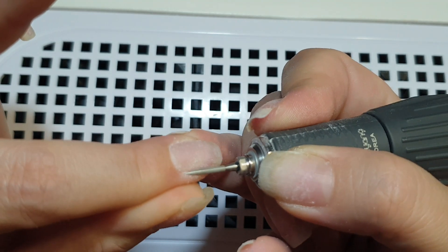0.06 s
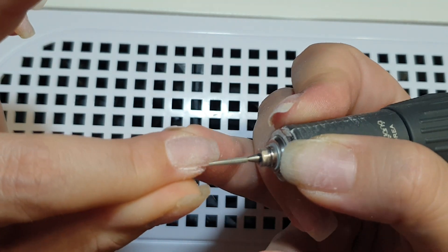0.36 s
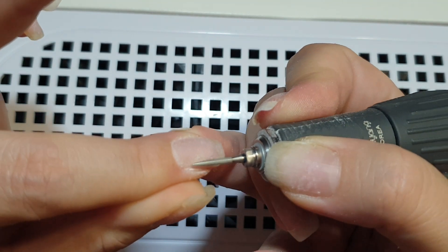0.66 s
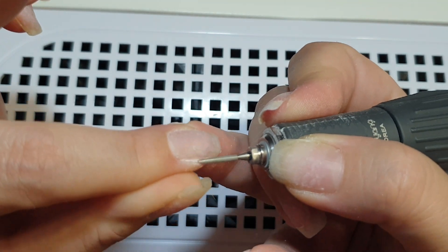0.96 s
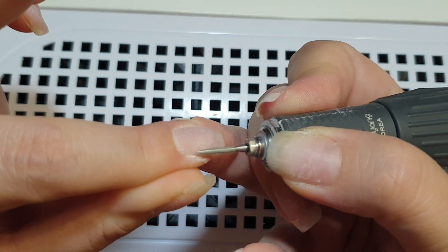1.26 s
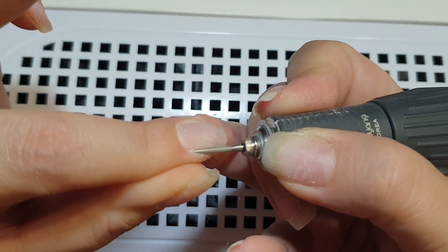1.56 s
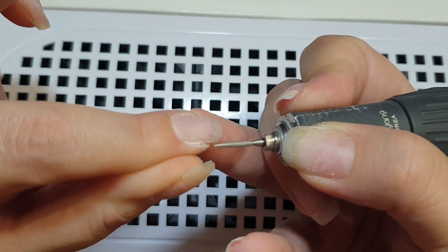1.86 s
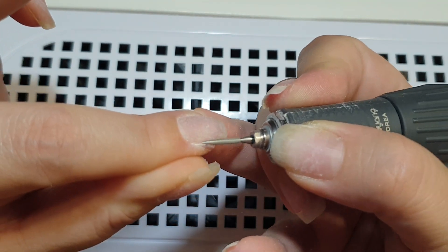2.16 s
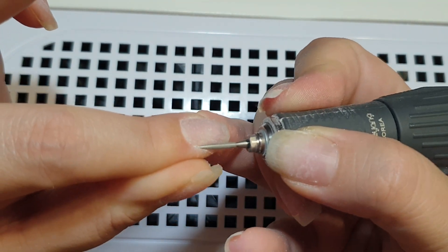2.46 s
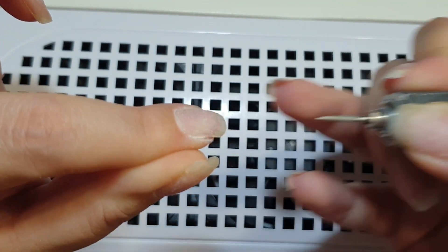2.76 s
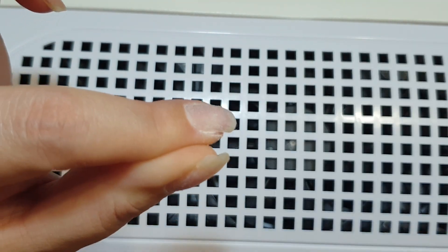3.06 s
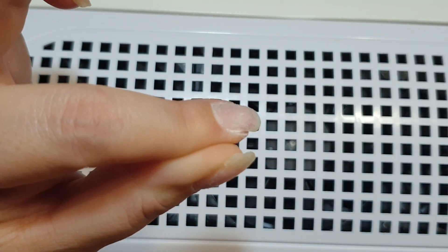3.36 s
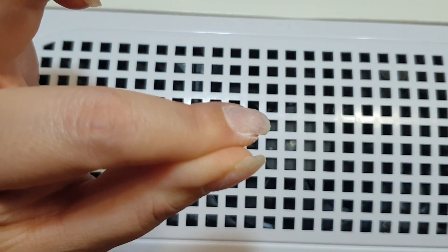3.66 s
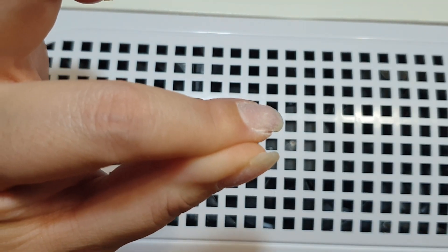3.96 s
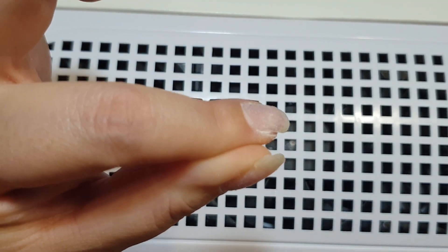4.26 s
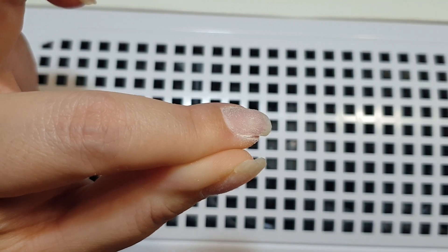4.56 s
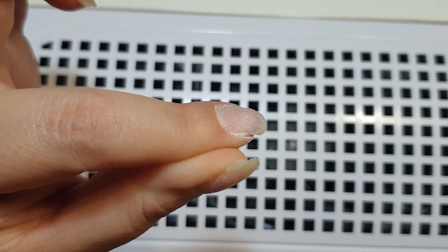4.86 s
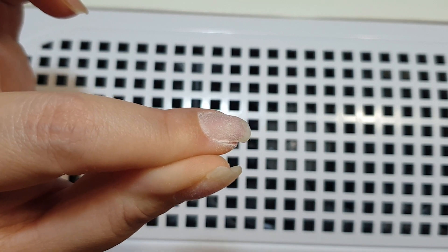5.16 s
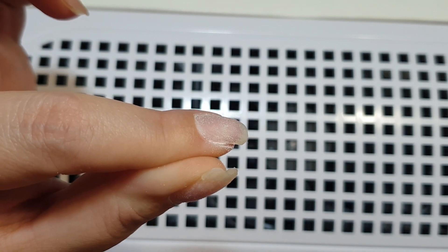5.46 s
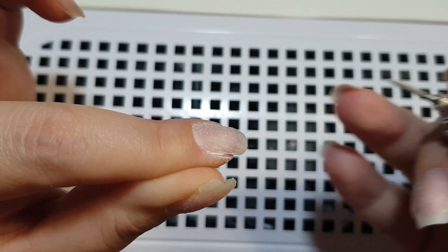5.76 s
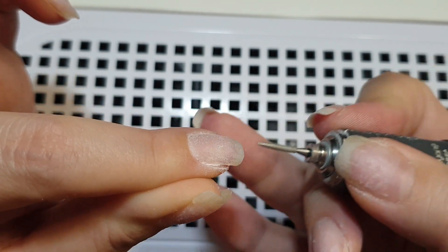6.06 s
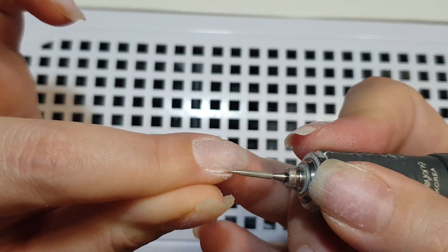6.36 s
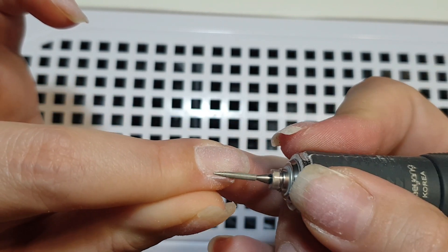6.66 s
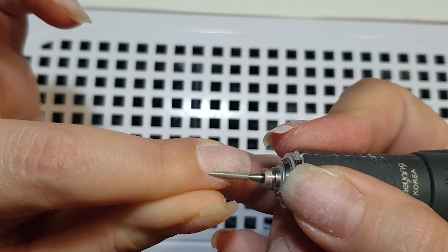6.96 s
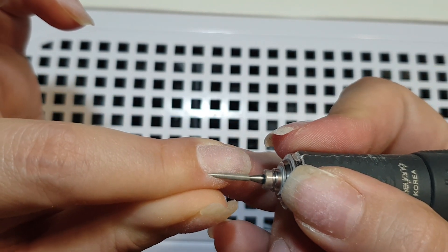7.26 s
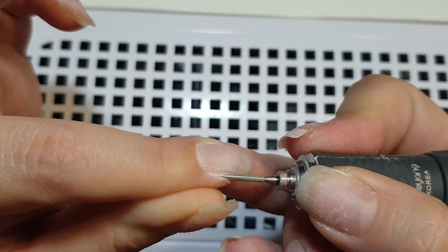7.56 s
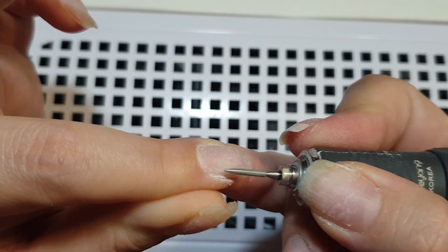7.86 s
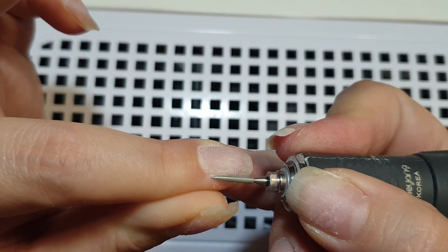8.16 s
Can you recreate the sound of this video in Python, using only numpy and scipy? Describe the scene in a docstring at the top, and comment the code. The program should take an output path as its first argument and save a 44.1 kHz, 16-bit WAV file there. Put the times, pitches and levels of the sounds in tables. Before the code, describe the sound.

Steady whine of a small nail drill that grazes a fingernail, is held aside still spinning, then returns for a few strokes.

```python
"""An electric nail drill spins close by at about 404 turns a second: hum, whine, bearing lines and a
pulsing hiss over a faint room rumble. From the start its bit rasps on a fingernail, a light graze with
short strokes. At 2.5 s the handpiece is drawn away past the right microphone and held aside while the
fingers shift softly. It comes back between 5.2 and 6.1 s, and from 7 s three more strokes follow."""
import sys
import numpy as np
from scipy import signal
from scipy.fft import rfft, irfft, next_fast_len
from scipy.io import wavfile
from scipy.ndimage import map_coordinates

SR = 44100
rng = np.random.default_rng(int(sys.argv[2]) if len(sys.argv) > 2 else 0)


def store_wav(level_fs):
    """Save 16-bit WAV to argv[1]."""
    pcm = np.round(np.clip(np.atleast_2d(level_fs), -1, 1) * 32767)
    wavfile.write(sys.argv[1], SR, pcm.T.astype(np.int16))


N = 362061

# Commutator whine. Each row: time in seconds, left level in dB, right level in dB.
WHINE_DB = [(0.0, -42, -44.5), (0.25, -40.5, -46.5), (0.78, -45.5, -40.5), (1.13, -56, -44),
            (1.7, -38.5, -40), (2.25, -46, -42.4), (2.6, -44, -35.6), (2.85, -37.5, -38.5),
            (3.14, -34, -29.5), (3.4, -40, -35.5), (3.62, -34, -43), (3.9, -38.5, -44.5), (4.5, -37, -42),
            (5.1, -35.5, -38), (5.41, -37, -30), (5.72, -35, -36.5), (6.08, -36.5, -35), (6.3, -53, -37.5),
            (6.55, -37, -42), (6.9, -37, -40.5), (7.15, -38.5, -42), (7.42, -35.5, -38), (7.75, -41, -38),
            (8.21, -44, -45)]
# Whine nulls. Each row: time in seconds, microphone (0 left, 1 right), half length in seconds, depth in dB.
WHINE_NULLS = [(.49, 0, .076, 12), (.7, 1, .03, 8), (1.81, 1, .122, 8), (2.59, 1, .144, 13),
               (2.98, 1, .046, 14), (3.05, 0, .071, 13), (3.07, 1, .025, 6), (3.225, 1, .028, 7),
               (3.26, 0, .083, 15), (3.38, 1, .035, 6), (3.54, 1, .026, 11), (5.03, 0, .04, 7),
               (5.14, 1, .031, 17), (5.23, 0, .083, 13), (5.295, 1, .028, 8), (5.5, 0, .117, 17),
               (5.57, 1, .047, 4), (6.02, 0, .117, 11), (7.51, 1, .04, 5)]
# Reflections off the hands shift the whine. Each row: time in seconds, extra left lag in ms.
WHINE_LAG_MS = [(.7, -0.025), (.8, 0.013), (3.25, 0.023), (3.41, 0.099), (3.62, 0.0078), (3.9, -0.058),
                (4.35, 0.011), (4.85, 0.014), (5.05, -0.034), (5.3, 0.002), (5.8, 0.049), (6.15, -0.13),
                (6.55, 0.024), (7, -0.027), (7.4, -0.023), (7.57, -0.015), (7.7, 0.012), (7.95, -0.035)]
# Weaker shaft harmonics. Each row: shaft multiple, relative level in dB at the nail, then aside.
HARMONICS_DB = [(2, -75, -66), (3, -58, -67), (4, -64, -67), (5, -62, -59), (7, -58, -54), (8, -62, -61),
                (9, -61, -65), (11, -66, -65), (13, -63, -63), (14, -58.5, -57.5), (15, -64, -63),
                (16, -64, -62), (17, -55.5, -58), (19, -58, -54), (20, -59, -56), (21, -63, -61),
                (22, -64, -67), (23, -62, -57), (24, -62, -61), (25, -59, -62), (26, -56.5, -55.5),
                (27, -57, -55), (29, -56, -60), (30, -60.5, -55), (31, -60, -55), (32, -59, -61),
                (33, -60, -61), (34, -62, -60), (36, -64, -64), (37, -63, -67), (38, -60, -64)]
# Whistles at harmonics 18, 28 and 35. Each row: time in seconds, relative level in dB left, then right.
WHISTLE_18_DB = [(0, -62, -58), (2.5, -62, -60), (2.84, -61, -52), (3.64, -58.5, -56), (4.16, -69, -68),
                 (4.24, -49.5, -47.5), (4.96, -52, -49.5), (5.08, -56, -66), (5.32, -58, -51),
                 (5.48, -68, -62), (5.8, -60, -53), (6.3, -62, -57), (8.21, -62, -59)]
WHISTLE_28_DB = [(0, -48, -57), (0.8, -52, -58), (1.08, -53, -63), (1.8, -49, -58), (1.92, -54, -64),
                 (2.76, -50.5, -53), (2.84, -43.5, -47.5), (2.96, -51.5, -52), (3.12, -53, -40),
                 (3.44, -49.5, -50), (3.68, -42.5, -39), (4, -52.5, -57.5), (4.26, -37.5, -43.5),
                 (4.86, -39.5, -44.5), (5.04, -50, -48), (5.52, -51, -42), (5.92, -52.5, -53.5),
                 (6.32, -44, -56), (6.64, -47.5, -52.5), (7.56, -60, -55), (7.76, -46, -52.5),
                 (8.21, -59, -59)]
WHISTLE_35_DB = [(0, -47, -52), (0.16, -63, -53), (0.52, -53, -50), (1.36, -54, -47.5), (1.8, -61, -49),
                 (2.44, -55, -52), (3, -58, -48), (3.6, -53, -61.5), (4.56, -52, -61.5), (5.44, -60, -51),
                 (5.6, -58.5, -61), (5.72, -56.5, -48), (6.36, -48.5, -48.5), (6.48, -47.5, -57.5),
                 (6.96, -46, -57), (7.52, -59.5, -60.5), (8.21, -48.5, -57.5)]
# Strongest bearing line. Each row: time in seconds, level in dB.
BALL_DB = [(0.0, -52), (0.51, -56.5), (0.76, -50.5), (1.02, -60), (1.65, -50), (1.78, -61), (2.16, -53.5),
           (3.17, -61), (3.3, -55.5), (4.44, -60.5), (4.83, -54.5), (5.08, -60), (5.59, -46.5), (5.84, -53),
           (7.37, -49.5), (7.75, -58), (7.87, -50), (8.21, -53)]
# Other bearing lines. Each row: shaft multiple, relative level in dB.
BEARING_LINES_DB = [(3.303, -63), (16.874, -60), (21.59, -62), (27.55, -62), (34.76, -62)]
# Hiss spectrum. Each row: frequency in Hz, gain in dB at the nail, aside, in a pass.
HISS_COLOUR_DB = [(150, -19, -19, -25.5), (325, -15.5, -15.5, -18), (520, -8, -19.5, -11.5),
                  (572, -16, -21.5, -21), (1090, -7.5, -14.5, -14.5), (1740, -8, -9, -8),
                  (2044, 0.5, -5.5, -14.5), (2330, -2, -4.5, -2.5), (2870, 0.5, -9, -4.5),
                  (3000, -1, -3.5, -1), (3230, -5.5, -6, -5), (3870, -5.5, -4.5, -4.5),
                  (4720, -6.5, -7, -7), (4960, -7, -8.5, -8.5), (5460, -7.5, -11, -10),
                  (7200, -11, -10.5, -15), (8060, -14, -14, -16), (8900, -12, -11, -20),
                  (9800, -14, -15, -16), (10700, -10, -11, -19), (12600, -19.5, -16, -13),
                  (15600, -23, -19, -21)]
# Shading of one microphone. Each row: frequency in Hz, right minus left in dB at the nail, aside, in a pass.
BALANCE_DB = [(960, 0, -3, 2.6), (1980, 2, 5, 2.4), (4530, -2, 0, 6.6), (7150, 6, 1.5, 9.6),
              (9300, 0.5, -6, 4.6), (10900, -3, -1, 9.9), (13500, -15, 0.5, 13)]
# Hiss arriving straight from the handpiece. Each row: frequency in Hz, power share 0-1.
DIRECT_SHARE = [(300, 0.51), (1200, 0.54), (2200, 0.44), (3500, 0.63), (4700, 0.35), (7000, 0),
                (15000, 0.13)]
# Bit on nail. Each row: start in seconds, length in seconds, first level in dB, last level in dB,
# pressure 0-1, left minus right in dB, ring of the nail in Hz.
BIT_STROKES = [(0, 2.75, -50, -51.5, 0, 10, 6880), (0.01, 0.23, -41, -37, 0.82, 6, 6070),
               (0.725, 0.15, -38.5, -35.5, 0.12, 7.5, 5660), (1.345, 0.02, -33.5, -29, 0.22, 6.5, 5660),
               (1.383, 0.035, -36, -36.5, 0.1, 5, 6470), (1.654, 0.055, -39, -34.5, .3, 4.5, 6470),
               (1.745, 0.045, -42, -39.5, 0.61, 6, 5660), (2.373, 0.2535, -44, -41.5, .8, 9, 5660),
               (7.067, 0.071, -42, -52, 0.51, 2, 6470), (7.256, 0.34, -45, -39.5, 1, 0, 6360),
               (7.937, 0.019, -31.5, -43, 0.83, 2, 5560)]
# Response of bit and nail. Each row: frequency in Hz, gain in dB.
BIT_RESPONSE_DB = [(4600, -28), (5250, -12), (5660, -3), (6070, -6.5), (6470, -5.5), (6880, -4.5),
                   (7280, -9), (7700, -11.5), (8080, -9), (8500, -14), (9700, -20), (14000, -36)]
# Room rumble spectrum. Each row: frequency in Hz, relative level in dB.
RUMBLE_DB = [(12, -35), (20, 2.5), (59, 1), (83, 2), (102, -9), (135, 2.5), (188, -16), (330, -8),
             (430, -14), (730, -120)]
# Hand rubs. Each row: centre in seconds, length in seconds, pitch in Hz, width over pitch, level in dB.
HAND_RUBS = [(0.429, 0.15, 207, 0.29, -61), (2.61, 0.038, 150, 0.9, -56), (2.713, 0.1, 56.7, .25, -63),
             (4.047, 0.03, 272, 0.49, -58), (4.09, .04, 56, .3, -60), (4.364, 0.16, 221, .12, -59.5),
             (4.508, 0.05, 280, .22, -59), (4.924, 0.087, 227, .06, -53.5), (5.098, 0.2, 184, .12, -66),
             (5.28, 0.057, 300, 0.36, -53.5)]
# Sweeps past the right microphone. Each row: time in seconds, direction (positive away, negative back).
MIC_PASSES = [(3.141, 0.58), (5.42, -0.67)]

FREE_HZ = 404.5  # unloaded shaft
LEAVE_S, LEAVE_TAKES_S, RETURN_S, RETURN_TAKES_S = 2.52, 1, 5.15, 0.99
SETTLE_S, SETTLE_TAKES_S = 6.34, 0.11  # new grip, a little nearer
LEFT, RIGHT = np.eye(2)[:, :, None]  # channel masks


def amp(db):
    """Decibels to gain."""
    return np.exp(np.asarray(db) * (np.log(10) / 20))


def unit(x):
    """Scaled to rms 1."""
    return x / np.sqrt(np.mean(x ** 2) + 1e-20)


def along(points, hz, column=1):
    """One table column, interpolated over log frequency."""
    columns = np.transpose(points)
    return np.interp(np.log(hz + 1), np.log(columns[0] + 1), columns[column])


def curves(rows):
    """One value per sample for each column after the time."""
    times_s, *columns = np.transpose(rows)
    return np.array([np.interp(np.arange(N) / SR, times_s, column) for column in columns])


def ramp(start_s, takes_s):
    """Linear rise from 0 to 1."""
    return np.clip((np.arange(N) / SR - start_s) / takes_s, 0, 1)


def bell(centre_s, half_s):
    """Gaussian swell to 1."""
    return np.exp(-((np.arange(N) / SR - centre_s) / half_s) ** 2)


def wander(path, size=2048):
    """Smooth random curve, one knot per unit of path."""
    coarse = np.linspace(0, N - 1, size * 2).astype(int)
    values = map_coordinates(rng.standard_normal(size), [path[coarse]], mode="wrap")
    return np.interp(np.arange(N), coarse, values)


def wobble(rate_hz):
    """Smooth random curve in time."""
    return wander(np.arange(N) * (rate_hz / SR))


def filtered(x, response):
    """x through a complex frequency response."""
    size = next_fast_len(N + SR // 4, real=True)
    return irfft(rfft(x, size) * response(np.fft.rfftfreq(size, 1 / SR)), size)[..., :N]


def tone(cycles):
    """Sine of rms 1 from a running cycle count."""
    return np.sqrt(2) * np.sin((2 * np.pi * (cycles - np.floor(cycles))).astype(np.float32))


def narrow_noise(cycles, width_hz):
    """Noise of rms 1 around a tone."""
    lowpass = lambda hz: 1 / (1 + 1j * hz / width_hz) / (1 + 1j * hz / (4 * width_hz))
    in_phase, quadrature = filtered(rng.standard_normal((2, N)), lowpass)
    return unit(in_phase * tone(cycles) + quadrature * tone(cycles + 1 / 4))


def delayed(x, delay_ms, order=3):
    """Sliding fractional delay."""
    return map_coordinates(x, [np.arange(N) - delay_ms * SR / 1000], order=order, mode="nearest")


def at_microphones(x, lag_ms):
    """Stereo pair; the left lags."""
    return np.array([delayed(x, lag_ms), x])


def balance_db(hz, column):
    """Left and right gain for one place of the handpiece."""
    return (RIGHT - LEFT) / 2 * along(BALANCE_DB, hz, column)


def moving(aside):
    """1 halfway through a move, 0 at rest."""
    return 4 * aside * (1 - aside)


def strokes(attack_s=0.0096, release_s=0.047, press_s=0.12):
    """Each stroke bites, holds and lets go: stereo rasp gain, and the slower hand pressure."""
    scrape, pressure = np.zeros((2, N)), np.zeros(N)
    ring_hz = np.zeros(N)
    for start_s, length_s, first_db, last_db, press, pan_db, nail_hz in BIT_STROKES:
        held = lambda rise_s, fall_s: ramp(start_s - rise_s, rise_s) - ramp(start_s + length_s, fall_s)
        level_db = first_db + (last_db - first_db) * ramp(start_s, length_s)
        gain = held(attack_s, release_s) * amp(level_db + pan_db * (LEFT - RIGHT) / 2)
        scrape = np.maximum(scrape, gain)
        pressure += press * held(press_s, press_s)
        ring_hz[max(round((start_s - attack_s) * SR), 0):] = nail_hz  # holds until the next stroke
    return scrape, pressure, ring_hz


def shaft(pressure, sag_hz=1.6, inertia_s=0.136):
    """Running turn count: pressure slows the rotor, inertia smooths the change."""
    pole = np.exp(-1 / (inertia_s * SR))
    load = signal.lfilter([1 - pole], [1, -pole], pressure)
    return np.cumsum(FREE_HZ - sag_hz * load + 0.13 * wobble(20)) / SR


def place(nail_ms=0.1465, aside_ms=0.0774, pass_ms=0.43, nail_side_s=0.14, far_side_s=0.099):
    """Handpiece position: left lag in ms, drawn aside 0-1, close to the right microphone 0-1."""
    t = np.arange(N) / SR
    aside = ramp(LEAVE_S, LEAVE_TAKES_S) - ramp(RETURN_S, RETURN_TAKES_S)
    close, swing = np.zeros((2, N))
    for pass_s, direction in MIC_PASSES:
        close += bell(pass_s, np.where(direction * (t - pass_s) < 0, nail_side_s, far_side_s))
        swing += bell(pass_s + direction * 0.0089, half_s=0.2887)
    drift_ms = 0.0022 * np.maximum(t - SETTLE_S, 0)  # slow turn toward the middle
    resting_ms = nail_ms + aside * (aside_ms - nail_ms) - drift_ms
    return resting_ms + swing * (pass_ms - resting_ms), aside, close


def hum(turns, lag_ms, aside, close, pressure, free_db=-56.5, press_db=4, pass_loss_db=6.5):
    """Unbalance hums once a turn, louder under pressure; aside, the hand shields the left side."""
    level_db = free_db + press_db * pressure - pass_loss_db * close + 1.73 * wobble(30)
    shield_db = aside * (2.5 * RIGHT - 6 * LEFT)
    return amp(level_db + shield_db) * at_microphones(tone(turns), lag_ms * 0.58)


def rotor_buzz(turns, aside, scrape, base_db=-48, scrape_db=6, aside_loss_db=7, move_loss_db=6):
    """Rough buzz six times a turn, louder as the bit scrapes, radiated in two opposed lobes."""
    contact = np.tanh(scrape.mean(axis=0) / amp(-39))
    level_db = base_db + scrape_db * contact - aside_loss_db * aside - move_loss_db * moving(aside)
    level_db += 0.16 * wobble(40)
    buzz = unit(tone(6 * turns) + 0.19 * narrow_noise(6 * turns, width_hz=40))
    lobes = np.array([1.1 - 1.35 * aside, 0.68 + 0.67 * aside])  # aside, the far lobe faces left
    return amp(level_db) * buzz * lobes


def whine(heard_turns):
    """Commutator tone, ten times a turn; nulls between its lobes sweep over the microphones."""
    level_db = curves(WHINE_DB)
    for centre_s, mic, half_s, depth_db in WHINE_NULLS:
        level_db[mic] -= depth_db * bell(centre_s, half_s)
    late_turns = LEFT * curves(WHINE_LAG_MS) * FREE_HZ / 1000
    return amp(level_db + 0.6 * wobble(50)) * tone(10 * (heard_turns - late_turns))


def harmonics(heard_turns, aside, travel, flutter_db=2.56, beam_db=3, beam_hz=7000):
    """Reflections swell, fade and phase-shift each harmonic; on the move, high ones beam in flashes."""
    motion = moving(aside)
    depth_db = 2 + 1.5 * motion
    out = np.zeros((2, N))
    for multiple, nail_db, aside_db in HARMONICS_DB:
        hz = multiple * FREE_HZ
        level_db = nail_db + aside * (aside_db - nail_db + balance_db(hz, 2)) + flutter_db * wobble(45)
        level_db += beam_db * motion * min(hz / beam_hz, 1) ** 2 * (1 + 0.5 * wobble(20))
        start_cycles = rng.random()
        for mic in range(2):
            shift_cycles = start_cycles + 0.25 * rng.standard_normal() + 0.13 * wander(travel)
            gain = amp(level_db[mic] + depth_db * wander(travel))
            out[mic] += gain * tone(multiple * heard_turns[mic] + shift_cycles)
    return amp(-1.5) * out


def whistles(heard_turns, aside, travel, flutter_db=1.5, pattern_db=1.5, moving_db=2.5):
    """Three strong high harmonics beam narrowly, so they come and go as the hand turns."""
    out = np.zeros((2, N))
    for multiple, levels in ((18, WHISTLE_18_DB), (28, WHISTLE_28_DB), (35, WHISTLE_35_DB)):
        level_db = curves(levels) + flutter_db * wobble(45)
        for mic in range(2):
            shift_cycles = 0.2 * rng.standard_normal() + 0.14 * wander(travel)
            swell_db = pattern_db * wander(travel) + moving_db * moving(aside) * wobble(22)
            out[mic] += amp(level_db[mic] + swell_db) * tone(multiple * heard_turns[mic] + shift_cycles)
    return amp(-0.5) * out


def bearing(heard_turns, swell_db=2, slip_cycles=0.08, ball_multiple=4.414):
    """Rolling balls slip, so their lines waver between the harmonics; the strongest comes and goes."""
    line = lambda multiple: tone(multiple * heard_turns + slip_cycles * wobble(25))
    out = amp(curves(BALL_DB) + wobble(22)) * line(ball_multiple)
    for multiple, level_db in BEARING_LINES_DB:
        out += amp(level_db - 4.5 + swell_db * wobble(6.2)) * line(multiple)
    return out


def cage(turns, rounds_per_turn=0.3678, throb=0.72, flaw_count=256):
    """The ball cage rolls over the same flaws every round: a whirr of close lines."""
    rounds = rounds_per_turn * turns + 0.0054 * wobble(25)
    flaws = map_coordinates(rng.standard_normal(flaw_count), [rounds % 1 * flaw_count], mode="grid-wrap")
    return unit(flaws * (1 + throb * tone(turns)))


def brush_noise(turns, lag_ms, aside, travel, cage_share=0.3, echo_gain=0.29, throb=0.18):
    """Brush and bearing noise, direct plus diffuse, combed by a table echo; throbs once a turn."""
    share = lambda hz: np.clip(along(DIRECT_SHARE, hz), 0, 1)
    source = np.sqrt(1 - cage_share) * rng.standard_normal(N) + np.sqrt(cage_share) * cage(turns)
    direct = filtered(at_microphones(source, lag_ms), lambda hz: np.sqrt(share(hz)))
    diffuse = filtered(rng.standard_normal((2, N)), lambda hz: np.sqrt(1 - share(hz)))
    noise = direct + diffuse
    for mic in range(2):
        echo_ms = 0.702 + 0.365 * aside + 0.16 * wander(travel)
        noise[mic] += echo_gain * delayed(noise[mic], echo_ms, order=2)
    return unit(noise * (1 + throb * tone(turns)) * amp(0.5 * wobble(90)))


def hiss(noise, aside, close, base_db=-30.5, aside_db=1.57, pass_db=3, grip_db=3.5, grip_hz=4700):
    """The handpiece's place colours the brush noise; the hand shades the far side of each pass."""
    def coloured(column, low_cut_hz=140):
        gain = lambda hz: amp(along(HISS_COLOUR_DB, hz, column) + balance_db(hz, column))
        return filtered(noise, lambda hz: gain(hz) * hz ** 2 / (hz ** 2 + low_cut_hz ** 2))

    at_nail, at_side, in_pass = coloured(1), coloured(2), coloured(3)
    new_grip = filtered(at_nail, lambda hz: amp(grip_db * np.exp(-((hz - grip_hz) / 1100) ** 2)))
    at_nail += ramp(RETURN_S, RETURN_TAKES_S / 2) * (new_grip - at_nail)
    blend = (1 - close) * ((1 - aside) * at_nail + aside * at_side) + close * in_pass
    shade_db = 2 * sum(bell(pass_s + direction * 0.25, half_s=0.14) for pass_s, direction in MIC_PASSES)
    settle_db = 0.6 * ramp(SETTLE_S, SETTLE_TAKES_S)
    return blend * amp(base_db + aside_db * aside + pass_db * close - shade_db + settle_db)


def housing(turns, aside, close, ring_hz=2860, width_hz=170, base_db=-54, aside_db=5, pass_db=5):
    """Bearing rattle rings the hollow handpiece, more freely off the nail, loudest in a pass."""
    rattle = rng.standard_normal((2, N)) * (1 + 0.9 * tone(turns))
    resonance = lambda hz: (1j * hz * width_hz / (ring_hz ** 2 - hz * hz + 1j * hz * width_hz)) ** 2
    side_db = RIGHT * (1 + pass_db * close) - 2 * LEFT
    return unit(filtered(rattle, resonance)) * amp(base_db + aside_db * aside + side_db)


def rasp(turns, lag_ms, scrape, ring_hz, ring_db=4, ring_width_hz=260, grit_db=-6, chatter_db=1.5):
    """The same teeth drag over the nail each turn: a ragged buzz, plus grit catching twice a turn."""
    buzz = np.zeros(N)
    for multiple in range(12, 25):
        partial_hz = multiple * FREE_HZ
        lift_db = ring_db * np.exp(-((partial_hz - ring_hz) / ring_width_hz) ** 2)
        # the sliding contact point varies level and phase
        level_db = along(BIT_RESPONSE_DB, partial_hz) + lift_db + 3.5 * wobble(45)
        buzz += amp(level_db) * tone(multiple * turns + rng.random() + 0.11 * wobble(110))
    catches = rng.standard_normal(N) * (1 + 0.49 * tone(2 * turns))
    grit = filtered(catches, lambda hz: amp(along(BIT_RESPONSE_DB, hz)))
    grinding = unit((unit(buzz) + amp(grit_db) * unit(grit)) * amp(chatter_db * wobble(160)))
    return scrape * at_microphones(grinding, lag_ms * 0.32)


def room(level_db=-73):
    """Faint low rumble, mostly alike on both sides."""
    noise = rng.standard_normal(N) + 0.85 * rng.standard_normal((2, N))
    return amp(level_db) * unit(filtered(noise, lambda hz: amp(along(RUMBLE_DB, hz))))


def hands():
    """Skin shifts on skin and plastic: short dull rubs, some faintly pitched."""
    out = np.zeros(N)
    for centre_s, length_s, pitch_hz, width, level_db in HAND_RUBS:
        band = lambda hz: 1 / (1 + (np.log((hz + 1) / pitch_hz) / width) ** 2)
        rub = unit(filtered(rng.standard_normal(N), band))
        out += amp(level_db) * rub * bell(centre_s, length_s) ** 2
    return out


def scene():
    """One shaft drives all drill layers; strokes load it, its place sets colour and delay."""
    scrape, pressure, ring_hz = strokes()
    turns = shaft(pressure)
    lag_ms, aside, close = place()
    lag_turns = LEFT * lag_ms * FREE_HZ / 1000
    heard_turns = turns - lag_turns
    # aside, overtones arrive off the table at both microphones together
    overtone_turns = turns - lag_turns * 0.91 * (1 - aside)
    # path through the reflection pattern: slow drift plus the big moves
    travel = np.cumsum(1.2 / SR + 20 * np.abs(np.gradient(lag_ms)))
    drill = hum(turns, lag_ms, aside, close, pressure) + rotor_buzz(turns, aside, scrape)
    drill += whine(heard_turns)
    drill += harmonics(overtone_turns, aside, travel) + whistles(overtone_turns, aside, travel)
    drill += bearing(heard_turns)
    drill += hiss(brush_noise(turns, lag_ms, aside, travel), aside, close)
    drill += housing(turns, aside, close)
    return drill + rasp(turns, lag_ms, scrape, ring_hz) + hands() + room()


def record(dry, top_hz=15750):
    """Brick-wall low-pass."""
    return filtered(dry, lambda hz: hz < top_hz)


dry = scene()
out = record(dry)
store_wav(out)
```